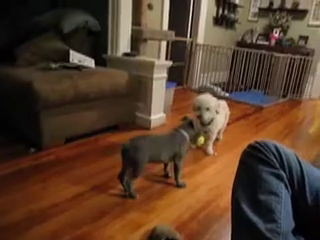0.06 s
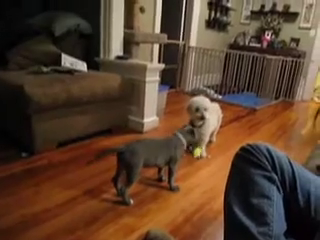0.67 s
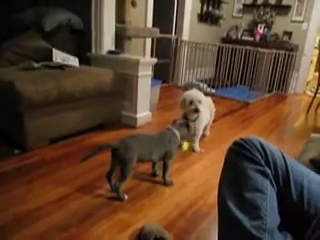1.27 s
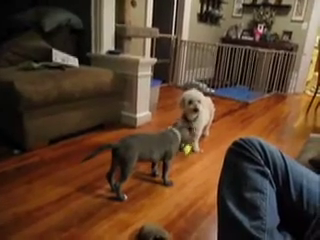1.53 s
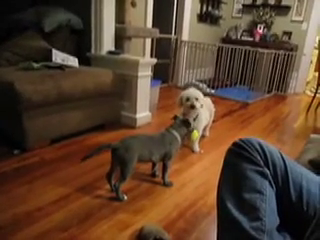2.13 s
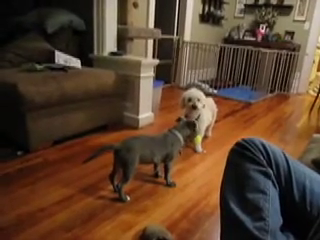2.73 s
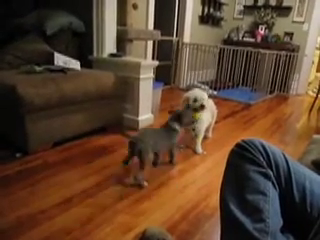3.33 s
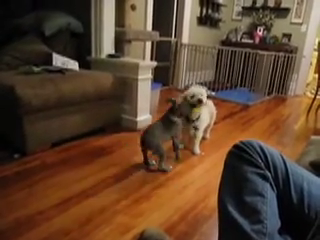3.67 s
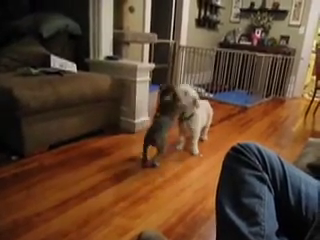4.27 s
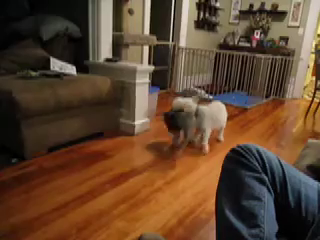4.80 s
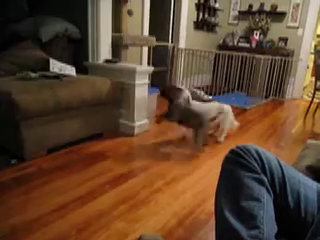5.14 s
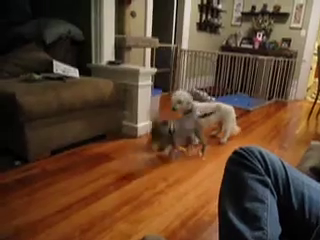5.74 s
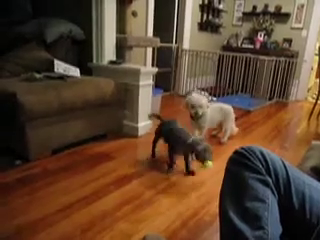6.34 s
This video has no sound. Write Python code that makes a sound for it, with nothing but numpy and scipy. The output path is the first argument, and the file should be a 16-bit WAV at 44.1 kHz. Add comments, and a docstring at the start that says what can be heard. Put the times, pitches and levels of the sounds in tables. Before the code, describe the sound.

A puppy bites a squeaky ball three times, giving short, high, sharp squeaks with pauses between. It then tussles with a second dog: paws thump and slide on wooden boards, claws tick, fur rustles and collar tags clink faintly. The ball softly sucks in air and squeaks once more. The living room rings briefly after each squeak, heard from a few metres away over a low hum and hiss.

```python
"""A squeaky ball, bitten four times by a puppy on a wooden living-room floor, a few metres off the mic.
Each bite drives air through a reed; a tooth or the rubber clicks just after the third, and later the
ball sucks air back in. Between the last two bites the puppy tussles with a second dog: paws thump and
slide on the boards, claws tick, fur rustles, collar tags clink. The room rings on after each squeak,
over a low hum and hiss. Mono, the same on both channels."""
import sys
import numpy as np
from scipy import signal
from scipy.fft import rfft, irfft, next_fast_len
from scipy.io import wavfile
from scipy.ndimage import uniform_filter1d

SR = 44100
rng = np.random.default_rng(int(sys.argv[2]) if len(sys.argv) > 2 else 0)


def unload_wav(signal):
    """Save mono or channel-first audio to the path in sys.argv[1] as 16-bit WAV at rate SR, clipped to [-1, 1]."""
    wavfile.write(
        sys.argv[1],
        SR,
        np.round(np.clip(np.atleast_2d(signal).T, -1, 1) * 32767).astype(np.int16),
    )


N = 281358
TIME = np.arange(N) / SR
REST_HZ = 1104.4  # the reed's lowest pitch


def amp(db):
    """Decibels to gain."""
    return 10 ** (np.asarray(db) / 20)


def unit(x):
    """Scales to rms 1."""
    return x / np.sqrt(np.mean(x ** 2) + 1e-20)


def read(points, hz):
    """A curve's value at any frequency, on a log axis."""
    f, value = np.transpose(points)
    return np.interp(np.log(hz + 1), np.log(f + 1), value)


def add(mix, start_s, sound):
    """Mixes a sound in at its start time."""
    part = mix[max(round(start_s * SR), 0):][:len(sound)]
    part += sound[:len(part)]


def coloured(x, points):
    """Filters x by a curve of (f/Hz, gain/dB), then scales to rms 1."""
    size = next_fast_len(len(x), True)
    gain = amp(read(points, np.fft.rfftfreq(size, 1 / SR)))
    return unit(irfft(rfft(x, size) * gain, size)[:len(x)])


def band(x, lo_hz, hi_hz):
    """Band-pass filter."""
    return signal.sosfilt(signal.butter(3, [lo_hz, hi_hz], "band", fs=SR, output="sos"), x)


def wander(size, hz):
    """Random drift of rms 1, mostly slower than hz."""
    at = np.arange(size) * 2 * hz / SR
    knots = np.random.default_rng(rng.integers(2 ** 31)).standard_normal(int(at[-1]) + 2)
    return unit(np.interp(at, np.arange(len(knots)), knots))


def ring(x, modes):
    """Passes x through parallel resonances of (f/Hz, width/Hz, gain/dB)."""
    return sum(amp(db) * signal.lfilter(*signal.iirpeak(hz, hz / width, SR), x)
               for hz, width, db in modes)


def room_tone(hiss_db=-51.5, whine_hz=12300, whine_db=-71):
    """The bed under the scene: steady hiss, wavering appliance hum and a thin whine."""
    # spectrum of the hiss: f/Hz, relative level/dB
    hiss_colour = [(25, -8.5), (60, -7.5), (100, -3.5), (200, -7.5), (310, -5), (470, -7), (830, -6),
                   (1400, -9.5), (2400, -13.5), (3300, -16), (8000, -21), (11000, -25), (13000, -24.5),
                   (15500, -33)]
    # tones of the hum: f/Hz, relative level/dB
    hum = [(120, -81), (206, -72), (312, -68.5), (850, -68), (1152, -71), (2379, -72), (3806, -76),
           (7870, -77.5)]
    hiss = amp(hiss_db) * coloured(rng.standard_normal(N), hiss_colour)
    tones = [(hz + 3 * wander(N, 11), db + 0.5) for hz, db in hum]
    tones.append((whine_hz + 50 * wander(N, 110), whine_db))
    return hiss + sum(amp(db) * unit(np.sin(2 * np.pi * np.cumsum(hz) / SR)) for hz, db in tones)


def living_room(x, wet_db, near_db, build_s=0.0029):
    """The path to the mic: direct sound, near reflections and a tail that dies faster in the treble."""
    # reverberation time: f/Hz, t60/s
    decay = [(120, 0.67), (500, 0.43), (1400, 0.49), (4000, .5), (7000, 0.39), (11000, 0.32), (15000, 0.2)]
    # reflections off floor, furniture and walls: delay/s, relative gain
    reflections = [(.0019, 0.2), (.0043, -0.12), (.0071, 0.0058), (0.012, 0.25), (.0142, -0.016),
                   (0.0171, 0.17), (0.027, -0.0002)]
    size = SR * 3 // 4
    dense_echoes = np.fft.irfft(np.exp(2j * np.pi * rng.random(size // 2 + 1)))  # flat spectrum
    hz, t, spectra = signal.stft(dense_echoes, SR, nperseg=256)
    tail = signal.istft(spectra * amp(-60 * t / read(decay, hz)[:, None]), SR, nperseg=256)[1]
    tail *= 1 - np.exp(-np.arange(len(tail)) / SR / build_s)
    response = amp(wet_db) * tail / np.linalg.norm(tail)
    for delay, gain in reflections:
        response[round(delay * SR)] += amp(near_db) * gain
    response[0] += 1  # direct sound
    return signal.fftconvolve(x, response)[:N] / np.linalg.norm(response)


def stroke(start_s, length_s, rise_s=0.0052, fade_s=0.018):
    """Envelope of a rub: it builds, holds and dies away."""
    t = np.maximum(TIME - start_s, 0)
    return (1 - np.exp(-t / rise_s)) * np.exp(-np.maximum(t - length_s, 0) / fade_s)


def scuffle(fur_db=(-57.5, -57, -61.5), trim_db=(-4.5, -3.5, -5.0), grains_per_s=1200):
    """Pads and fur catch and slip on the varnish in tiny grains, in three bands: body, scrape, fizz."""
    # paw slides: t/s, length/s, then relative body/dB, scrape/dB, fizz/dB
    slides = [(3.314, 0.052, -64, -57, -52.5), (3.856, 0.29, -55, -54, -64), (4.073, 0.057, -50, -47, -51),
              (4.145, 0.047, -54, -49.5, -62), (4.273, .06, -51, -58, -57), (4.344, 0.063, -47, -49, -56),
              (4.475, 0.15, -43.5, -49.5, -52), (4.715, 0.055, -51, -42, -43.5),
              (4.828, 0.04, -45, -41, -41.5), (4.868, 0.069, -58, -32, -41),
              (4.936, 0.092, -49, -43.5, -45), (5.033, 0.078, -37.5, -46.5, -58),
              (5.151, 0.089, -39.5, -43, -44.5), (5.238, 0.1, -46, -42.5, -40.5),
              (5.51, 0.046, -70, -48, -62), (5.685, 0.2, -47.5, -50, -52)]
    # friction spectra, one each for body, scrape and fizz: f/Hz, relative level/dB
    rub_colours = [
        [(500, -16), (950, -0.5), (2200, -7), (4200, -25), (8000, -49)],
        [(1500, -11.5), (3200, 1.5), (5300, 2), (7500, -4), (11000, -24), (15000, -35)],
        [(5000, -34), (8300, -5), (11500, -2.5), (13500, -7), (15500, -14)],
    ]
    fur = stroke(start_s=3.18, length_s=2.8) * amp(2 * wander(N, 7.3))  # rustles all through the tussle
    band_powers = np.outer(amp(fur_db), fur) ** 2
    for start_s, length_s, *band_db in slides:
        band_powers += np.outer(amp(band_db), stroke(start_s, length_s)) ** 2
    slips = rng.standard_normal(N) * (rng.random(N) < grains_per_s / SR)
    slips *= amp(1.5 * np.minimum(rng.exponential(1, N), 4))  # a few grains stand out
    grip = amp(1.5 * wander(N, 70))
    friction = (unit(slips) + rng.standard_normal(N)) * grip
    return sum(coloured(friction, colour) * amp(db) * np.sqrt(power)
               for colour, db, power in zip(rub_colours, trim_db, band_powers))


def puff(flutter_db=4.0, rise_s=0.0018):
    """A short, dull rasp that flutters as it dies."""
    # gritty puff: t/s, level/dB, t60/s
    puffs = [(3.708, -39, 0.61)]
    # its spectrum: f/Hz, relative level/dB
    puff_colour = [(290, -47), (500, -22), (702, -9), (996, 1.5), (1980, -13), (2130, -11), (2350, -11),
                   (3860, -30), (6650, -21), (9000, -39), (11700, -65), (19800, -120)]
    out, t = np.zeros(N), np.arange(SR // 3) / SR
    for start_s, db, t60 in puffs:
        rasp = unit(band(coloured(rng.standard_normal(len(t)), puff_colour), 850, 11000))
        fade = amp(db - 60 * t / t60 + flutter_db * wander(len(t), 67))
        add(out, start_s, rasp * (1 - np.exp(-t / rise_s)) * fade)
    return out


def collar_tags():
    """Small metal discs touch, ring and bounce once."""
    # clinks: t/s, level/dB, which of the two tags
    clinks = [(4.464, -48, 1), (4.738, -38, 0), (4.965, -39, 0), (4.998, -36, 0), (5.17, -46, 1),
              (5.312, -44, 1), (5.342, -46, 1)]
    # modes of each tag: f/Hz, relative level/dB, t60/s
    tag_modes = [
        [(7420, -7, .13), (10950, -6, .08), (11060, 0, .14), (12900, -15, .15)],
        [(9450, -2, .26), (10700, -2, .16), (12400, -4, .08)],
    ]
    out, t = np.zeros(N), np.arange(SR // 3) / SR
    for start_s, db, tag in clinks:
        clink = amp(db) * sum(amp(mode_db - 60 * t / t60) * np.sin(2 * np.pi * hz * t)
                              for hz, mode_db, t60 in tag_modes[round(tag)])
        add(out, start_s, clink)
        add(out, start_s + rng.uniform(.006, .025), .3 * clink)
    return out


def paws(trim_db=-6, rub_s=0.014, push_s=0.0026):
    """A padded push and a brief rub set the floorboards booming; each spot favours other modes."""
    # paws landing: t/s, relative level/dB, hollow knock/dB, slap/dB
    landings = [(3.2, -49, -26, -12), (3.568, -44.5, -31, -15), (3.63, -45, -26, -4),
                (3.909, -44, -25, -22), (4.291, -41.5, -25, -11), (4.595, -33.5, -20.5, -6.5),
                (4.669, -32.5, -24, -8), (5.027, -35.5, -16, -26), (5.073, -33, -40, 1),
                (5.381, -32.5, -9, -13), (5.435, -28.5, -11, -1), (5.669, -38.5, -17.5, -9)]
    # modes of the floor: f/Hz, width/Hz, gain/dB
    boards = [(118.5, 23, 12), (197.5, 53, 13), (270, 96, -2), (580, 420, -12.5), (766, 93, -8),
              (1450, 120, -29)]
    out, t = np.zeros(N), np.arange(SR // 4) / SR
    for start_s, db, knock_db, slap_db in landings:
        rub = rng.standard_normal(len(t)) * np.exp(-t / rub_s)
        push = 0.71 * t / push_s * np.exp(-t / push_s)
        spot = [(115, 0), (200, knock_db + 12), (300, knock_db + 12), (550, slap_db + 14)]
        thump = ring(rub + push, [(hz, width, gain_db + read(spot, hz)) for hz, width, gain_db in boards])
        thump = band(band(thump, 96, 1900), 96, 1900)  # the floor radiates little below its lowest mode
        add(out, start_s, amp(db + trim_db) * thump / np.std(thump[:SR // 50]))
    return out


def hard_ticks(trim_db=-8, rise_s=0.001, tick_s=0.0031, tail_s=0.021):
    """A tooth or rubber click just after the third squeak, then claws ticking and skidding on wood."""
    # ticks, the click first and then the claws: t/s, relative level/dB, brightness/dB
    ticks = [(3.069, -31.5, -19), (3.386, -34, -11), (3.441, -38, -8), (3.491, -32.5, -11),
             (3.609, -36.5, -9), (3.898, -36, -12), (4.374, -27.5, -13), (4.488, -33, -7), (4.52, -31, -20),
             (4.6, -36, -14), (4.669, -35, -50), (4.7207, -21.5, -10), (4.843, -27.5, -10), (4.88, -19, -3),
             (4.925, -23, -8), (5.0408, -21, -17), (5.077, -28, -17), (5.233, -26, -11), (5.853, -29, -30)]
    # spectrum of a tick: f/Hz, relative level/dB
    tick_colour = [(290, -46), (500, -22.5), (1250, 1.5), (2330, -1.5), (2690, 1.5), (3330, -1.5),
                   (4640, -2), (11300, -9.5), (14200, -19), (15500, -26)]
    out, t = np.zeros(N), np.arange(SR // 8) / SR
    for start_s, db, bright_db in ticks:
        grit = coloured(rng.standard_normal(len(t)), tick_colour)
        grit = coloured(grit, [(4000, 0), (10000, 0.43 * (bright_db + 6))])
        envelope = (1 - np.exp(-t / rise_s)) * (np.exp(-t / tick_s) + 0.52 * np.exp(-t / tail_s))
        add(out, start_s, amp(db + trim_db) * grit * envelope)
    return out


def refill():
    """The released ball sucks air through its nozzle without sounding the reed."""
    # envelope of the intake: t/s, level/dB
    intake = [(5.64, -58), (5.701, -45.5), (5.78, -42.5), (5.86, -52), (5.94, -77)]
    # resonances of the nozzle: f/Hz, width/Hz, gain/dB
    nozzle = [(3800, 230, 2), (5200, 840, -6.5), (10400, 1100, -14)]
    times, db = np.transpose(intake)
    return unit(ring(rng.standard_normal(N), nozzle)) * amp(np.interp(TIME, times, db, -120, -120))


def squeeze(start_s, lead_s, swell_s, hold_s, catch_hz, top_hz, sag_hz_per_s):
    """Times, reed pitch and looseness (0-1) of a bite: pitch creeps up, catches, swells, sags, drops."""
    creep_hz, catch_s = 131, 0.0034  # the reed rises during the lead-in, then catches fast
    jaw_s, release_hz_per_s = .064, 7600  # the jaw closes slowly and lets go quickly
    loosen_s = 0.016  # the reed turns unsteady this long before the jaw lets go
    t = np.arange(-lead_s, hold_s + (top_hz - REST_HZ) / release_hz_per_s, 1 / SR)
    jaw = np.exp(-(np.minimum(t - swell_s, 0) / jaw_s) ** 2)
    grip = (jaw - jaw[0]) / (1 - jaw[0])
    held = catch_hz + (top_hz - catch_hz) * grip
    held -= sag_hz_per_s * np.clip(t - swell_s, 0, hold_s - swell_s)
    held -= release_hz_per_s * np.maximum(t - hold_s, 0)
    creep = REST_HZ + creep_hz * np.minimum(1 + t / lead_s, 1)
    caught = np.clip(t / catch_s, 0, 1)
    pitch = np.maximum(creep + caught * (held - creep), REST_HZ)
    looseness = np.clip((t - hold_s) / loosen_s + 1, 0, 1)
    return start_s + t, pitch, looseness


def blowing(hz, full_db=-21.5, choke_hz=259, steepness=1.89):
    """Drive in dB: the pressure that raises the pitch also raises the flow, until the nozzle chokes it."""
    flow = np.tanh((hz - REST_HZ) / choke_hz)
    return full_db + steepness * 20 * np.log10(flow + 1e-3)


def squeak(bite, beat_db=-31, knee_db=4.0, dull_below_db=-22.5, rasp=0.011, leak_db=9):
    """Air drives a reed: a near sine when soft, rich once it beats on its seat, raspy on release."""
    # spectrum of the squeaker: f/Hz, relative level/dB
    squeaker = [(1100, 5.5), (1450, 0), (2900, -6), (4300, 2.5), (5800, 0), (7200, 4.5), (8600, 2.5),
                (10000, -2), (11500, -7), (13000, -11), (14500, -20), (16000, -40)]
    *motion, level_db, air_db, first_db, second_db, fourth_db, treble_db, top_db = bite
    mouth = [(1500, first_db), (2900, second_db), (4300, 0), (5800, fourth_db),
             (8600, treble_db), (12000, top_db)]
    t, pitch, looseness = squeeze(*motion)
    hz = uniform_filter1d(pitch, size=120) * (1 + .0016 * wander(len(t), 250))
    hz *= 1 + rasp * looseness * wander(len(t), 300)
    phase = 2 * np.pi * np.cumsum(hz) / SR
    blow_db = blowing(pitch)
    beating = 1 / (1 + np.exp((beat_db - blow_db) / knee_db))
    slack_db = 0.2 * np.maximum(dull_below_db - blow_db, 0)  # top overtones go first as pressure falls
    tone = 0
    for k in range(1, 12):
        strength = amp(read(squeaker, k * hz) + read(mouth, k * hz) - (k - 0.5) * slack_db)
        strength *= beating if k > 1 else 2 - beating
        flutter = 1 + .04 * wander(len(t), 120)
        tone += strength * flutter * np.sin(k * phase + rng.uniform(0, 2 * np.pi))
    air = unit(band(coloured(rng.standard_normal(len(t)), squeaker), 900, 14000))
    air *= amp(air_db + leak_db * looseness)
    edges = np.clip(np.minimum(t - t[0], t[-1] - t) / .001, 0, 1)  # 1 ms fades
    return t[0], amp(blow_db + level_db) * (unit(tone) + air) * edges


def squeaky_ball():
    """Four bites force air through the reed; the puppy's mouth shades each squeak differently."""
    # bites: t/s, lead-in/s, time to hardest squeeze/s, time to letting go/s, catch pitch/Hz,
    # top pitch/Hz, sag/(Hz/s), relative level/dB, air against tone/dB,
    # then mouth shading/dB at the fundamental, second harmonic, fourth harmonic, treble and top
    bites = [(.005, .006, 0.2, 0.23, 1429, 1627, 1540, 1.57, -35, -2, -1.5, -1.5, 0.6, -1.5),
             (.906, .007, 0.023, .038, 1394, 1479, 830, 0.88, -32, -2, 1.5, -2, 1.5, 2),
             (2.8931, .016, .016, .054, 1400, 1433, 1150, 5.4, -32, 2.5, -0.5, 4.5, -5.5, -2.5),
             (6.0, .001, 0.023, 0.11, 1454, 1553, 1823, 1.23, -25.5, 0.5, 9, 4.5, -0.5, 1)]
    out = np.zeros(N)
    for bite in bites:
        add(out, *squeak(bite))
    return out


def scene():
    """Ball and dogs share one room, a few metres from the mic; the rustle is the driest layer."""
    ball = squeaky_ball()
    knocks = paws() + hard_ticks() + collar_tags()
    rustle = scuffle() + puff() + refill()
    mono = (living_room(ball, wet_db=-1, near_db=-6)
            + living_room(knocks, wet_db=-1.5, near_db=-13)
            + living_room(rustle, wet_db=-7.0, near_db=-11)
            + room_tone())
    return np.array([mono, mono])


def record(dry):
    """The recorder's band limit: a steep low-pass."""
    edge_hz = 15700
    lowpass = signal.firwin(511, edge_hz, window=("kaiser", 9), fs=SR)
    return signal.oaconvolve(dry, lowpass[None], "same")


dry = scene()
out = record(dry)
unload_wav(out)
```